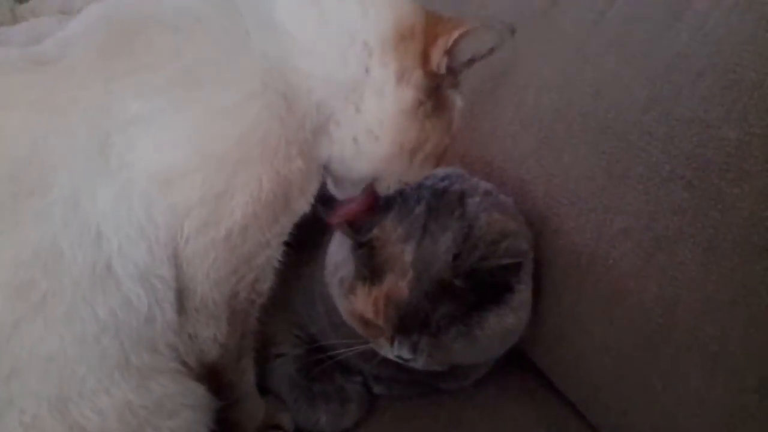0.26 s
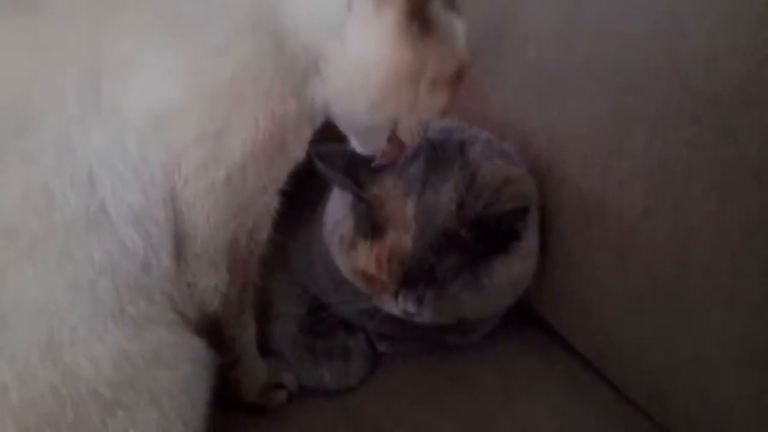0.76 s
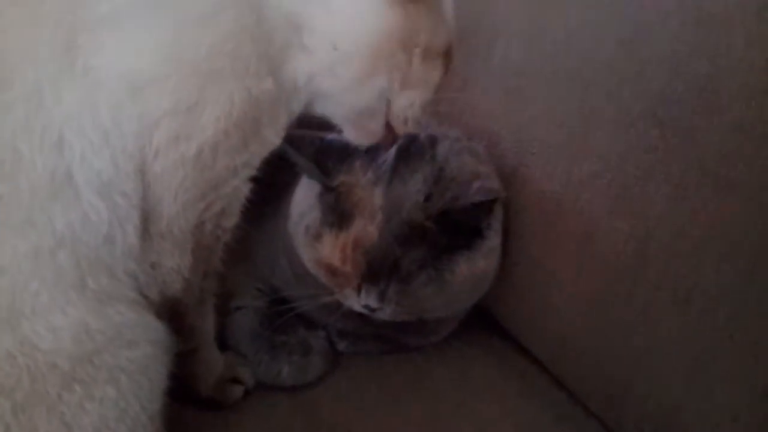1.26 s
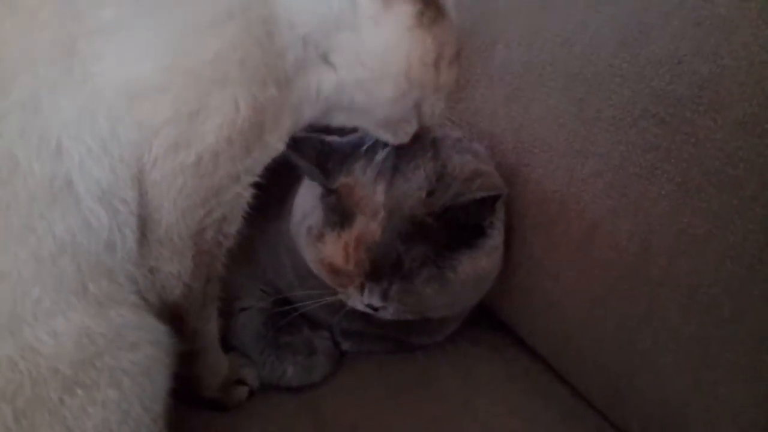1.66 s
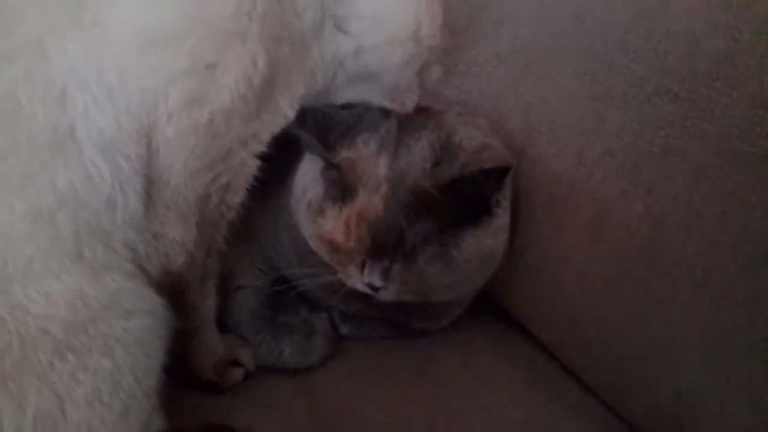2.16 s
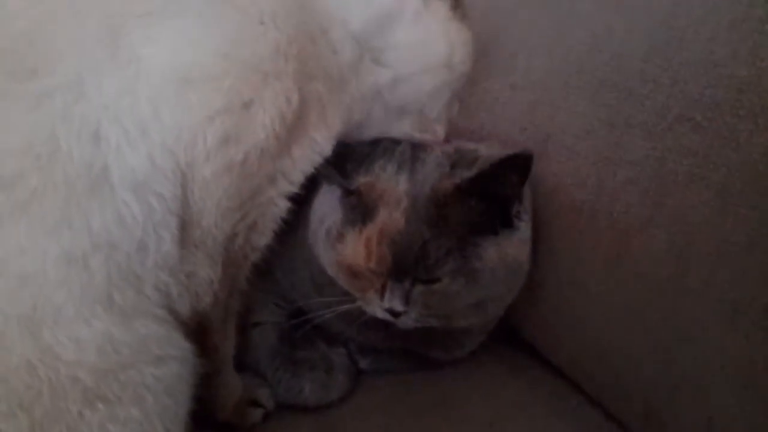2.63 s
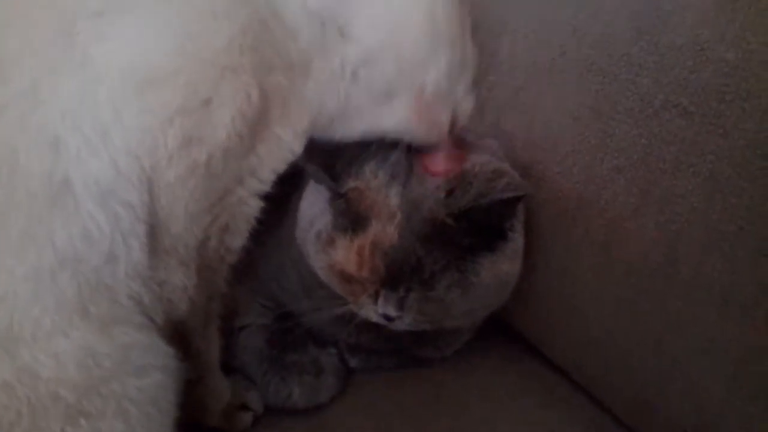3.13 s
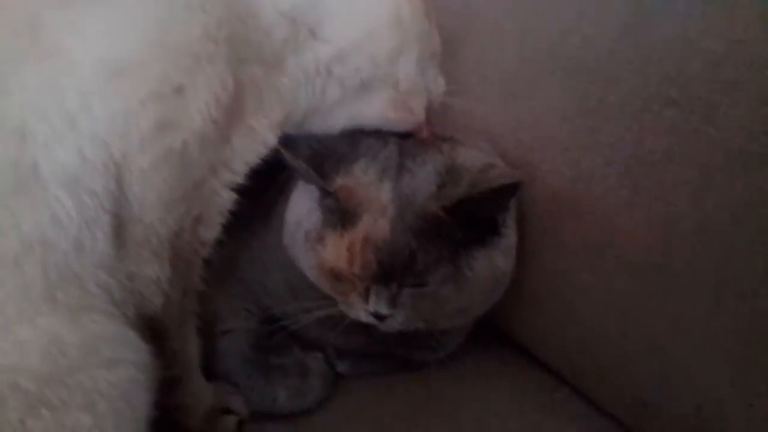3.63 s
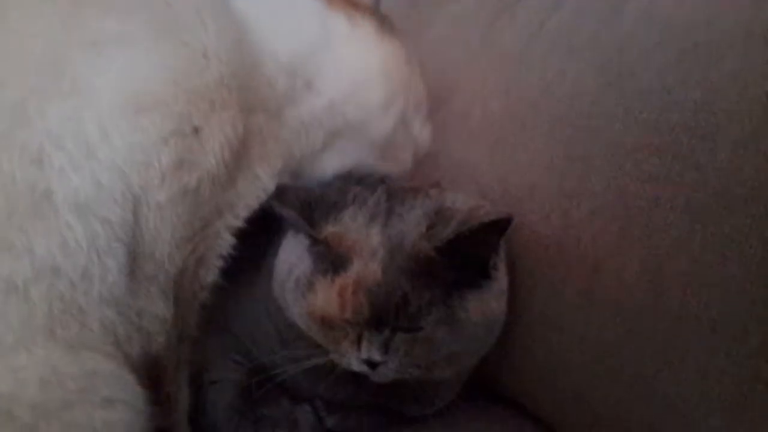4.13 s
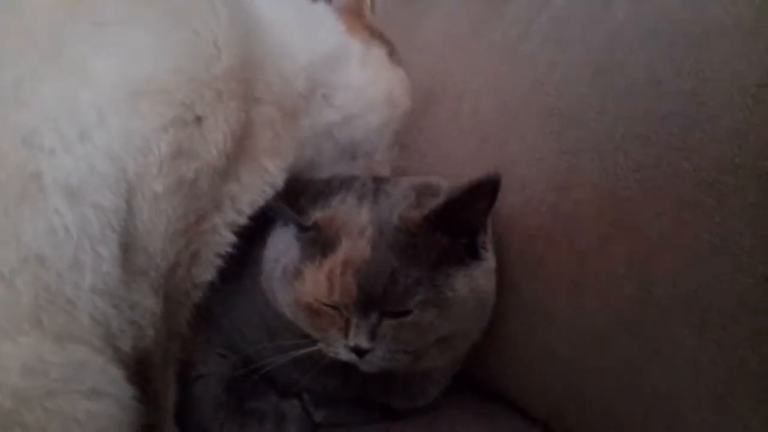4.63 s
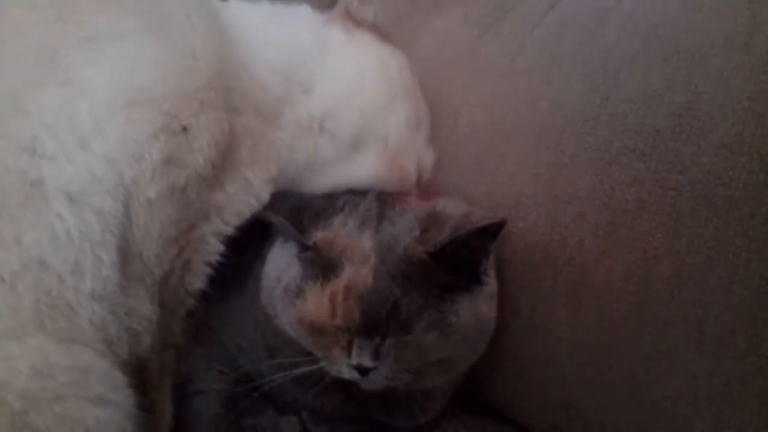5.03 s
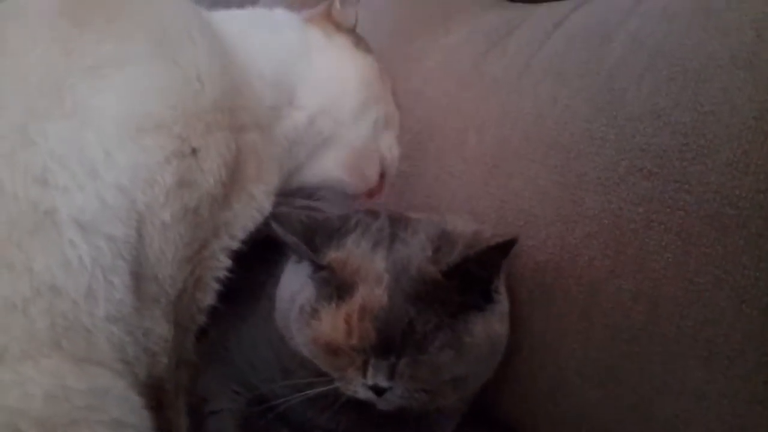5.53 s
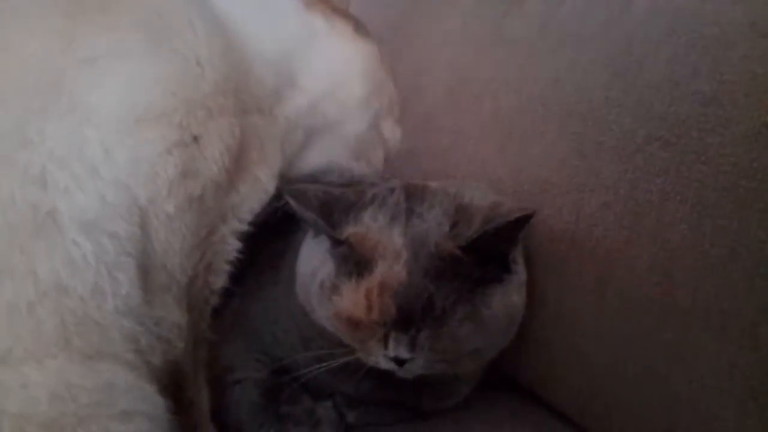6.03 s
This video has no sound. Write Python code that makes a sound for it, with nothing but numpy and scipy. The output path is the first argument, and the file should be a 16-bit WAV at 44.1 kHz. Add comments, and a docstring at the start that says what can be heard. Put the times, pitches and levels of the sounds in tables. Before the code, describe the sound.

A cat's rough tongue combs another cat's coat on a sofa. Brief bright scrapes with a faint low rub alternate with tiny hollow wet pops and brittle saliva ticks. After an opening burst the licking rests, then resumes in a steady rhythm. A dull cushion rumble and a hard crack arrive near four seconds; strokes weaken and small smacks close it. Intimate, quiet, faint low room tone.

```python
"""On a sofa in a quiet room, a cat grooms another cat's head close to a small microphone.
Its barbed tongue combs the fur in raspy strokes: a few at first, then, after a pause, a long run.
The strokes are filtered noise: bright for combed hairs, low for the tongue rubbing the coat.
Tiny wet smacks come in among them: a torn-film tick, a pop of falling pitch and a jaw thump.
Loud snaps, short whistles and blips, stray bubbles, a dull cushion rumble and room tone join in."""
import sys
import numpy as np
from scipy import signal
from scipy.fft import rfft, irfft
from scipy.io import wavfile

SR = 44100
rng = np.random.default_rng(int(sys.argv[2]) if len(sys.argv) > 2 else 0)


def generate_wav(sig):
    """Save sig (samples, or channels by samples) to the path in sys.argv[1] as 16-bit PCM at SR."""
    pcm = np.round(np.clip(np.atleast_2d(sig).T, -1, 1) * 32767).astype(np.int16)
    wavfile.write(sys.argv[1], SR, pcm)


N = 277389  # length of the scene in samples

# Tone colour of a saliva film letting go. Each row: frequency in Hz, filter gain in dB.
TICK_COLOUR = [(2000, -33), (5800, -25), (6900, -18), (7400, -4.5), (7850, -1), (8500, -9), (9500, -17.5),
               (11000, -30.5), (12800, -35.5), (14000, -27), (16000, -36)]
# Tone colour of a harder snap of the film. Each row: frequency in Hz, filter gain in dB.
CRACK_COLOUR = [(500, -19), (1500, -13.5), (2300, -4.5), (3400, -8), (4400, -0.5), (6000, -2), (6900, 12.5),
                (9000, 1.5), (11500, -2), (13000, -15), (15500, -15.5)]


def undb(db):
    """Turn decibels into a gain."""
    return 10 ** (np.asarray(db) / 20)


def unit(x):
    """Scale a sound to an average (rms) strength of 1."""
    return x / np.sqrt(np.mean(x ** 2))


def fade(t, t60):
    """Die away smoothly from time 0, reaching 60 dB down after t60 seconds."""
    return np.exp(-np.log(1000) * np.maximum(t, 0) / max(t60, 1e-4))


def colour(x, points, size=2048):
    """Filter a sound to the given (Hz, dB) curve, with no sound ahead of its cause."""
    hz, db = np.transpose(points)
    grid = np.maximum(np.arange(size // 2 + 1) * SR / size, 1)
    gain = undb(np.interp(np.log(grid), np.log(hz), db))
    # folding the cepstrum (the spectrum of the log gain) puts the energy as early as possible
    cepstrum = irfft(np.log(gain))
    cepstrum[1:size // 2] *= 2
    cepstrum[size // 2 + 1:] = 0
    response = irfft(np.exp(rfft(cepstrum)))
    return signal.fftconvolve(x, response)[:len(x)]


def resonance(x, hz, width_hz):
    """Let one narrow band ring, with gain 1 at its centre."""
    b, a = signal.iirpeak(hz, hz / width_hz, fs=SR)
    return signal.lfilter(b, a, x)


def wander(rate, size=N):
    """Join random values of spread 1 by straight lines, rate values a second."""
    return np.interp(np.arange(size) * rate / SR, np.arange(size), rng.standard_normal(size))


def add(out, s, sound):
    """Mix a sound into out, starting at s seconds."""
    i = int(s * SR)
    out[i:i + len(sound)] += sound[:N - i]


def room(room_db=-77, waver_db=1.26, port_hz=7650, port_width_hz=900, port_db=-96):
    """Room tone is low, slightly uneven noise; the microphone port adds a narrow band of hiss."""
    # Tone colour of the room. Each row: frequency in Hz, filter gain in dB.
    room_colour = [(25, -13), (60, -6), (110, -2.5), (200, -4.5), (350, -10), (600, -17.5), (1000, -21),
                   (2000, -26), (4000, -32.5), (16000, -34.5)]
    rumble = unit(colour(rng.standard_normal(N), room_colour, size=8192))
    hiss = unit(resonance(rng.standard_normal(N), port_hz, port_width_hz))
    return undb(room_db + waver_db * wander(15)) * rumble + undb(port_db) * hiss


def stroke_pressure(t, attack, hold, touch_db, settle_db_per_s=235, tail_db=-25, tail_t60=0.92):
    """The tongue lands softly, presses in, holds and lifts; a faint slow tail outlasts it."""
    press = undb(np.minimum(touch_db - touch_db * t / attack, 0))
    lifted = t - attack - hold  # seconds since the pull ended
    settling = undb(-settle_db_per_s * np.maximum(lifted, 0))
    tail = undb(tail_db) * fade(lifted, tail_t60)
    return press * np.hypot(settling, tail), lifted


def stroke_texture(lifted, rub_db, gap_hz, catch_db=3.5, settle_db=1, snap_rate=170, snap_db=-9,
                   release_t60=0.16, gap_db=-1, gap_width_hz=650, bounce=0.3):
    """Barbs catch and release tufts of hair, making an uneven rasp, over the low rub of the tongue."""
    # Tone colour of hairs combed by the barbs. Each row: frequency in Hz, filter gain in dB.
    rasp_colour = [(1200, -30), (2000, -25.5), (3200, -21.5), (4100, -15), (5000, -14.5), (5900, -11.5),
                   (6600, -9), (7200, -2.5), (7800, 0), (8500, -13), (9300, -21.5), (10800, -35),
                   (13000, -42.5), (16000, -53.5)]
    # Tone colour of the tongue dragging on the coat. Each row: frequency in Hz, filter gain in dB.
    rub_colour = [(120, -21), (300, -6.5), (500, -7), (780, 3), (1100, -2.5), (1500, -4.5), (2200, -11.5),
                  (4000, -31)]
    size = len(lifted)
    grip = fade(lifted, release_t60)  # 1 until the pull ends, then fading as the barbs leave the fur
    unevenness_db = settle_db + (catch_db - settle_db) * grip
    tufts = undb(unevenness_db * wander(300, size) - 1.5 * grip)
    hairs = unit(rng.standard_normal(size) * undb(2 * wander(5000, size)))
    # now and then a single hair slips off a barb with a snap: on average snap_rate a second
    hair_snaps = unit((rng.random(size) < snap_rate / SR) * rng.standard_normal(size))
    rasp = colour(hairs * tufts + undb(snap_db) * grip * hair_snaps, rasp_colour)
    # the gap between muzzle and coat resonates
    rasp = rasp + undb(gap_db) * resonance(rasp, gap_hz, gap_width_hz)
    rub = unit(colour(rng.standard_normal(size) * tufts, rub_colour))
    sound = unit(rasp) + undb(rub_db) * rub
    # close reflections off head and sofa, with new delays (in samples) on each stroke
    lags = rng.integers(30, 300, 3)
    reflections = sum(np.roll(sound, lag) for lag in lags)
    return unit(sound + bounce * reflections)


def strokes(trim_db=-0.7, touch_db=-14, graze_db=-2, graze_t60=.45, slide_db=-4, bite_share=.7):
    """The tongue grazes the coat, slides, then its barbs bite; light strokes rub more and rasp less."""
    # Tongue strokes. Each row: first touch in seconds, level in dB before the common trim,
    # attack in seconds, hold in seconds.
    stroke_list = [(0.032, -44.5, 0.041, 0.0089), (0.168, -54, 0.047, 0.027), (0.3216, -49.5, .002, 0.0097),
                   (0.439, -64, 0.037, 0.1), (0.673, -77.5, 0.016, 0.2), (1.683, -66, 0.013, 0.015),
                   (1.825, -53, 0.014, 0.0013), (1.997, -53.5, 0.043, 0.01), (2.17, -47.5, 0.025, 0.0053),
                   (2.293, -49, 0.048, 0.039), (2.5, -48, 0.046, 0.038), (2.754, -44, 0.04, 0.016),
                   (2.917, -49.5, 0.062, 0.078), (3.171, -45, 0.063, 0.0061), (3.377, -46.5, 0.072, 0.0031),
                   (3.616, -46.5, 0.056, 0.022), (3.829, -52.5, 0.047, 0.022), (4.053, -52.5, 0.04, 0.014),
                   (4.14, -42, .026, .008), (4.332, -58, .006, 0.051), (4.516, -57, 0.005, 0.029),
                   (4.688, -69, 0.019, 0.067)]
    firm_db, firm_rub_db, rub_slope = -50.5, -19, .35  # a firm stroke, its rub, extra rub per dB lighter
    # the resonance between muzzle and coat changes from stroke to stroke
    usual_gap_hz, gap_spread = 4710, 0.18
    gaps_hz = usual_gap_hz * np.exp(gap_spread * rng.standard_normal(len(stroke_list)))
    out = np.zeros(N)
    for (s, db, attack, hold), gap_hz in zip(stroke_list, gaps_hz):
        start = max(s - .04, 0)  # the graze leads the touch
        t = start - s + np.arange(SR) / SR  # seconds since first touch
        # the barbs slide, more quietly, until they bite partway into the attack
        contact_db = graze_db * (t < 0) + slide_db * (t < bite_share * attack)
        contact = undb(contact_db) * fade(-t, graze_t60)
        pressure, lifted = stroke_pressure(t, attack, hold, touch_db)
        rub_db = firm_rub_db + rub_slope * (firm_db - db)
        texture = stroke_texture(lifted, rub_db, gap_hz)
        add(out, start, undb(db + trim_db) * contact * pressure * texture)
    return out


def specks(rate=7, speck_db=-72, spread_db=4):
    """Stray tiny bubbles of saliva burst at random, about rate a second, as filtered clicks."""
    bursts = (rng.random(N) < rate / SR) * undb(spread_db * rng.standard_normal(N))
    return undb(speck_db) * colour(bursts, CRACK_COLOUR)


def tear(t, points, threads_db=-19, threads_t60=0.0065):
    """A saliva film tears: one clean break, then a few threads as fading noise; peak 1."""
    film = undb(threads_db) * rng.standard_normal(len(t)) * fade(t, threads_t60)
    film[0] = 1
    sound = colour(film, points)
    return sound / np.abs(sound).max()


def pop(t, pitch_hz, start_hz, open_s=0.00047, peak_s=.0008, scatter_db=3.5):
    """A wet pocket opens between tongue and palate; its pitch drops as it grows, and the mouth rings on."""
    # Ring of the mouth after a pop. Each row: usual pitch in Hz, usual level in dB,
    # time to fall by 60 dB in seconds.
    mouth_modes = [(367, -15.5, .016), (540, -17.5, 0.012), (860.4, -17.5, 0.021), (1287, -16.5, 0.008),
                   (2270, -23.5, 0.011), (2980, -19, 0.0053), (4500, -22.5, 0.0026)]
    stretch = 1 + .06 * rng.standard_normal()  # the mouth has a slightly different shape each time
    hz = pitch_hz + (start_hz * stretch - pitch_hz) * np.exp(-t / open_s)
    swell = (t / peak_s * np.exp(1 - t / peak_s)) ** 2
    sound = swell * np.cos(2 * np.pi * np.cumsum(hz) / SR)
    after = np.maximum(t - peak_s, 0)
    for mode_hz, db, t60 in mouth_modes:
        ring = fade(after, t60) * np.sin(2 * np.pi * mode_hz * stretch * after)
        sound = sound + undb(db + scatter_db * rng.standard_normal()) * ring
    return sound


def thump(t, db, jaw_hz=190, soft_db=-52, tension=0.016, jaw_t60=.021, rise_t60=0.0034):
    """The jaw's soft knock is a short low tone; a harder pull tenses it and raises the pitch."""
    hz = jaw_hz * np.exp(tension * max(db - soft_db, 0))
    shape = fade(t, jaw_t60) * (1 - fade(t, rise_t60))
    return undb(db) * np.sin(2 * np.pi * hz * t) * shape


def smacks(crack_db=-14.5, pop_trim_db=0.5, low_cut_hz=125, size=4096):
    """The film tears with a tick, the pocket pops and the jaw thumps, most under a big, deep pocket."""
    # Wet smacks. Each row: start in seconds, tick level in dB, pop level in dB before the common trim,
    # pitch the pocket falls towards in Hz.
    smack_list = [(0.1244, -58, -41, 640), (0.2224, -33, -51, 580), (0.243, -70, -41, 624),
                  (0.3013, -72, -44, 654), (0.3454, -34, -38, 960), (0.3534, -61, -43, 720),
                  (0.4977, -48, -46, 550), (0.602, -47.5, -41, 590), (0.819, -67, -47, 1090),
                  (0.901, -46.5, -41.5, 608), (0.9836, -61.5, -46.5, 600), (1.1225, -49.5, -43, 613),
                  (1.1589, -43, -38, 372), (1.2314, -63.5, -43.5, 580), (2.6454, -49, -36, 800),
                  (2.8871, -54, -56, 470), (3.709, -48, -51.5, 473), (3.758, -62, -52, 454),
                  (3.792, -22.5, -33, 670), (3.8596, -47, -52.5, 500), (4.1245, -22, -33, 666),
                  (4.1824, -23.5, -36.5, 1196), (4.1852, -9, -26.5, 448), (4.6372, -55.5, -52.5, 520),
                  (4.6968, -39, -34.5, 800), (4.7343, -31, -33.5, 790), (4.7653, -36.5, -35, 750),
                  (4.778, -68, -48, 700), (4.82, -38.5, -32.5, 696)]
    usual_pop_db, usual_pocket_hz, usual_thump_db = -39, 619.7, -50  # an ordinary smack
    thump_slope, thump_db_per_octave = 0.68, 19  # more thump per dB of pop, per octave deeper
    usual_start_hz, start_hz_per_db = 2490, 35  # a harder pop starts at a higher pitch
    out, t = np.zeros(N), np.arange(size) / SR
    for s, tick_db, pop_db, pitch_hz in smack_list:
        harder_db = pop_db - usual_pop_db
        octaves_deeper = np.log2(usual_pocket_hz / pitch_hz)
        thump_db = usual_thump_db + thump_slope * harder_db + thump_db_per_octave * octaves_deeper
        tick = tear(t, TICK_COLOUR) + undb(crack_db) * tear(t, CRACK_COLOUR)
        add(out, s, undb(tick_db) * tick)
        start_hz = usual_start_hz + start_hz_per_db * harder_db
        add(out, s, undb(pop_db + pop_trim_db) * pop(t, pitch_hz, start_hz))
        add(out, s, thump(t, thump_db))
    # so small a mouth radiates almost no bass
    low_cut = signal.butter(2, low_cut_hz, "high", fs=SR, output="sos")
    return signal.sosfilt(low_cut, out)


def snaps(tick_db=-6, threads_db=-20, size=4096):
    """Now and then the stretched film breaks all at once with a broad crack."""
    # Hard snaps. Each row: start in seconds, level of the crack in dB.
    snap_list = [(0.3445, -15), (1.1572, -32.5), (1.1585, -21.5), (4.1843, -9.5)]
    out, t = np.zeros(N), np.arange(size) / SR
    for s, db in snap_list:
        crack = tear(t, CRACK_COLOUR, threads_db)
        tick = tear(t, TICK_COLOUR, threads_db)
        add(out, s, undb(db) * (crack + undb(tick_db) * tick))
    return out


def whistles(waver_hz=55, waver_rate=400):
    """Short whistles and blips, one a falling chirp just before a pop, glide and waver in pitch."""
    # Whistles and blips. Each row: start in seconds, length in seconds, start pitch in Hz and
    # end pitch in Hz (both before the waver), level in dB.
    whistle_list = [(0.379, 0.1, 4100, 4700, -74.5), (2.642, 0.00438, 1645, 640, -46),
                    (4.249, 0.056, 985, 765, -65.5), (4.331, 0.0034, 4820, 4560, -51),
                    (4.515, 0.0041, 4320, 4250, -54)]
    out = np.zeros(N)
    for s, length, start_hz, end_hz, db in whistle_list:
        size = max(int(length * SR), 2)
        hz = np.linspace(start_hz, end_hz, size) + waver_hz * wander(waver_rate, size)
        tone = np.hanning(size) * np.sin(2 * np.pi * np.cumsum(hz) / SR)
        add(out, s, undb(db) * tone)
    return out


def cushion(hz=90, width_hz=110):
    """The padding gives with a dull rumble, low resonant noise, as the cats' weight shifts."""
    # Level of the rumble, joined by straight lines. Each row: time in seconds, level in dB.
    level_points = [(3.5, -100), (3.75, -71.5), (4.0, -77), (4.2, -76.5), (4.45, -100)]
    level = undb(np.interp(np.arange(N) / SR, *np.transpose(level_points)))
    rumble = resonance(rng.standard_normal(N), hz, width_hz)
    rumble = resonance(rumble, hz, width_hz)  # a second pass makes it duller
    return level * unit(rumble)


def scene():
    """Add strokes, mouth sounds, whistles and cushion to the quiet room."""
    mouth = specks() + smacks() + snaps()
    return (room() + strokes() + mouth + whistles() + cushion())[None]


def record(dry, top_hz=16200, offset=-.0005):
    """The recorder cuts the highest treble; its converter sits slightly below zero."""
    top_cut = signal.ellip(8, .2, 70, top_hz, fs=SR, output="sos")
    return signal.sosfilt(top_cut, dry) + offset


dry = scene()
out = record(dry)
generate_wav(out)
```